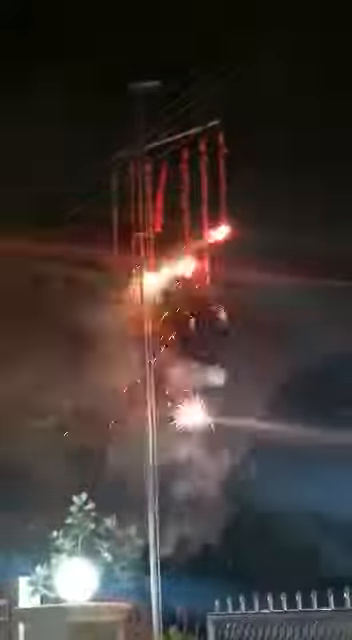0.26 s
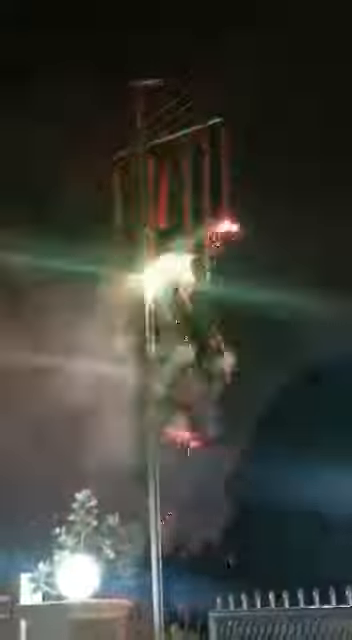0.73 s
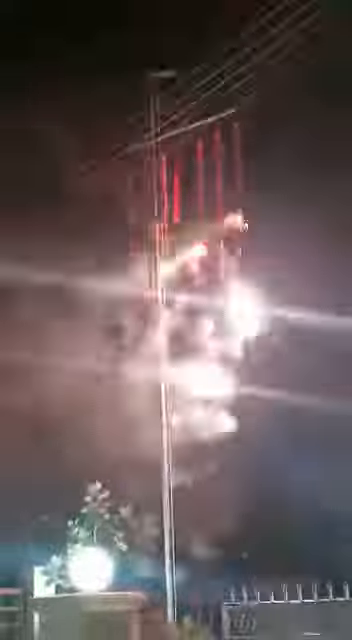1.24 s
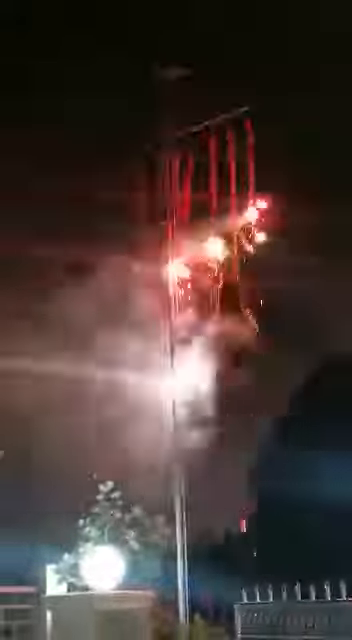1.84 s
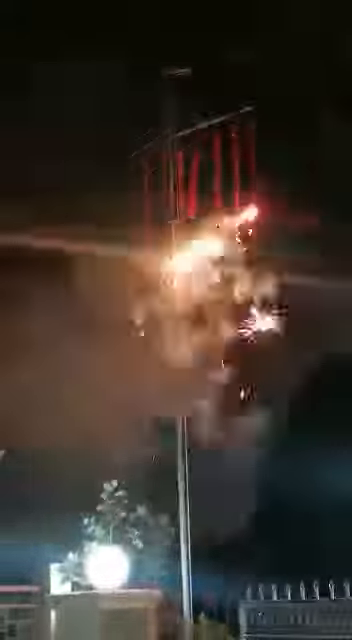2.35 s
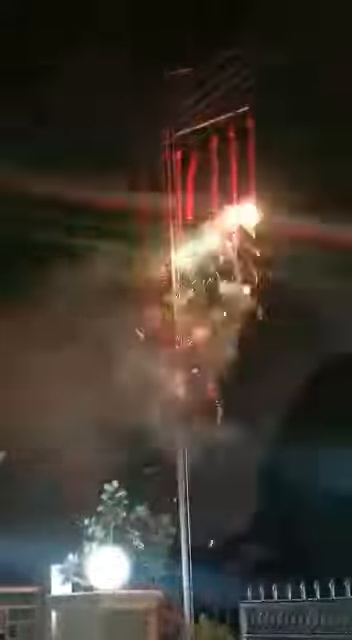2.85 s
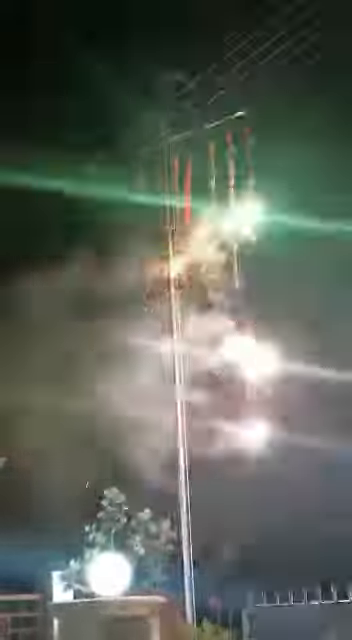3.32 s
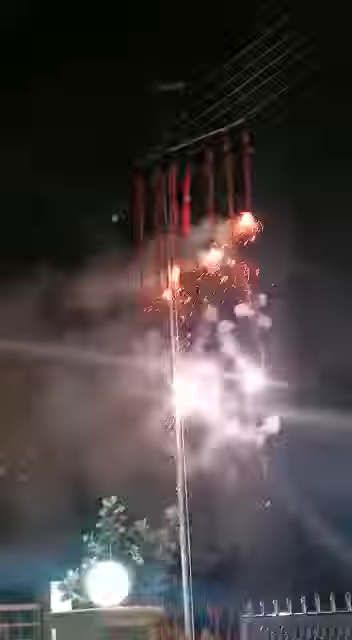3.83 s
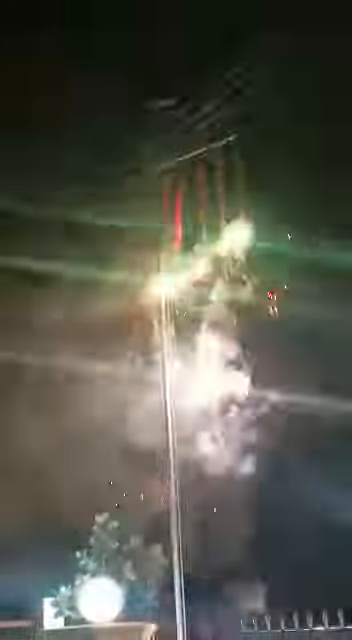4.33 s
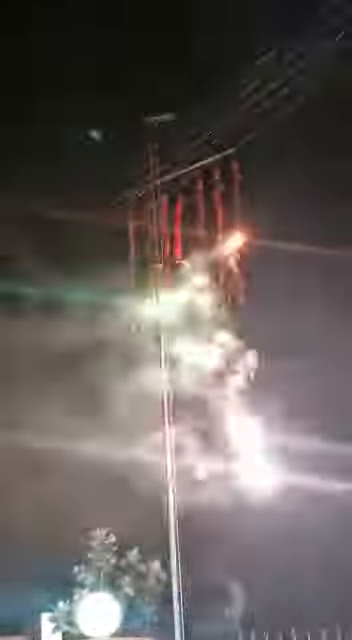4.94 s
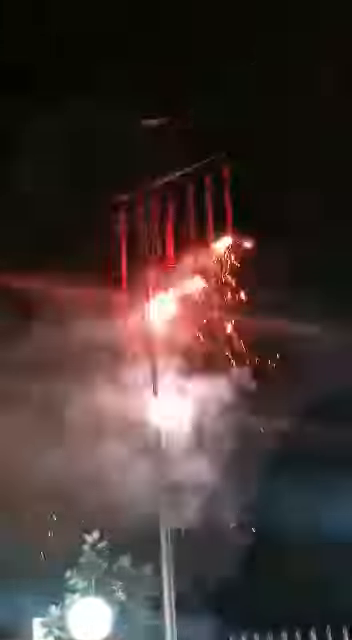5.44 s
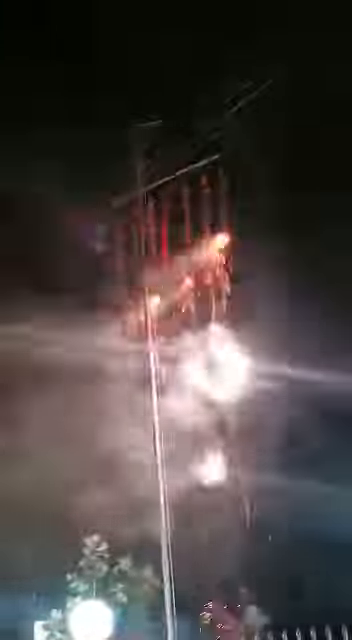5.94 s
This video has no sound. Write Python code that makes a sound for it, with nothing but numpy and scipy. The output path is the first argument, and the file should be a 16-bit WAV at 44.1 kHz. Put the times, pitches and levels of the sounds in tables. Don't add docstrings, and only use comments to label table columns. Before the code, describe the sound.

Dense firecracker crackle a few metres from a phone, outdoors between walls. Dozens of hard cracks per second or so overlap with quick slapback reflections and a half-second hissing reverberant tail. Nearest bangs clip and thud, jumping between the stereo sides. Levels are squashed, treble is dulled and slightly gritty. One soft far boom is heard near the start, one abrupt silence after four seconds, then the barrage continues to the end.

```python
import sys
import numpy as np
from scipy import signal
from scipy.fft import rfft, irfft
from scipy.io import wavfile

SR = 44100
rng = np.random.default_rng(int(sys.argv[2]) if len(sys.argv) > 2 else 0)


def amplitude_ratio(level_db):
    exponent = np.asarray(level_db, float) / 20
    return 10 ** exponent


def transcribe(u):
    v = np.clip(np.atleast_2d(u).T, -1, 1)
    q = np.round(v * 32767).astype(np.int16)
    wavfile.write(sys.argv[1], SR, q)


N = 272538


def band(x, lo_hz, hi_hz):
    return signal.sosfilt(signal.butter(2, [lo_hz, hi_hz], "bandpass", fs=SR, output="sos"), x)


def train(start_s, size):
    samples = np.clip((start_s * SR).astype(int), 0, N - 1)
    return np.bincount(samples, size, N)


# first_s, last_s, first_bang_db, other_bangs_db
VOLLEY_TIMES = [(0, .2261, -14.5, -21), (.318, .3293, -26, -20.5), (0.4025, .4029, -16, -20),
                (.604, .6598, -16, -21), (0.7117, .7746, -22, -20.5), (.8302, .8622, -18, -19.5),
                (.9133, .9484, -18.5, -21), (1.0052, 1.0308, -19, -17), (1.122, 1.2451, -15.5, -20.5),
                (1.3517, 1.4112, -16, -19), (1.614, 1.627, -17, -30), (1.698, 1.7263, -17.5, -20.5),
                (1.8019, 1.8415, -19.5, -17), (1.9133, 1.9424, -20, -19), (2.0211, 2.301, -18, -19.5),
                (2.3506, 2.7529, -18.5, -21), (2.8194, 2.9064, -18, -18.5), (2.979, 3.1198, -15.5, -20),
                (3.177, 3.2488, -17, -20.5), (3.312, 3.3559, -13.5, -17), (3.4422, 3.488, -17, -22),
                (3.537, 3.7205, -28.5, -19), (3.784, 3.8767, -20, -21), (3.939, 4.0222, -17, -19.5),
                (4.425, 4.5298, -10.5, -20), (4.7074, 4.877, -15.5, -25.5), (4.9293, 5.3592, -21, -22),
                (5.4407, 5.4726, -28, -19.5), (5.613, 5.7882, -23.5, -22), (5.9209, 6.1036, -20.5, -22)]
# start_s, bang_db, left_overload_db, right_overload_db
LEFT_FACING = [(.0339, -16, -19, -21), (.131, -17, -18, -21), (.8302, -16.5, -21, -22),
               (.9133, -19, -19, -25), (1.219, -17, -19, -19), (1.3923, -20, -18, -17.5),
               (1.468, -19.5, -21, -22), (1.7263, -16.5, -18, -21), (2.0213, -18, -21, -25),
               (2.4435, -22, -19, -35), (2.583, -22, -21, -25), (2.979, -13.5, -18, -18),
               (3.3559, -27.5, -17, -24), (3.4611, -21.5, -18, -19), (3.784, -15.5, -15, -17),
               (3.791, -16.5, -18, -40.5), (3.9391, -16, -20, -25.5), (4.4661, -25, -19.5, -12),
               (4.5298, -19, -14.5, -24), (4.7076, -14.5, -21, -16), (4.8011, -20.5, -14, -18),
               (4.9294, -21.5, -15, -17), (5.011, -19, -22, -43), (5.064, -15, -22, -13.5),
               (5.1656, -20.5, -18, -31), (5.3592, -41, -22, -40), (5.4406, -18, -19.5, -19),
               (5.6486, -22, -17.5, -20), (5.9622, -16.5, -21, -30), (6.1478, -16.5, -19, -19)]
# start_s, bang_db, left_overload_db, right_overload_db
RIGHT_FACING = [(.072, -16.5, -22, -17), (.7115, -22, -40, -19.5), (1.0152, -18, -38, -19),
                (1.1538, -17, -42, -14.5), (1.8017, -20, -40, -18), (1.807, -23.5, -24, -19),
                (2.2314, -21.5, -40, -16), (2.2735, -24, -26, -19), (2.4547, -24, -38, -18),
                (2.6834, -24, -38, -18), (2.8191, -18, -32, -16), (2.8624, -20.5, -25, -21),
                (2.8972, -14, -28, -16), (3.177, -17.5, -26, -20), (3.2336, -18, -37, -18),
                (3.488, -16, -42, -14), (3.5834, -27, -22, -17), (3.6092, -23, -30, -20),
                (3.985, -21.5, -20, -18), (4.0698, -13.5, -37.5, -20.5), (4.7573, -20.5, -25, -15.5),
                (4.8441, -15.5, -26, -20), (4.968, -23, -43, -19), (5.1036, -18, -40, -15),
                (5.148, -20.5, -38, -16), (5.2412, -26, -42, -17.5), (5.3283, -29, -33, -18.5),
                (5.75, -21.5, -28, -16), (5.856, -20, -24, -17.5), (6.1176, -21, -40, -17)]
# start_s, bang_db, left_overload_db, right_overload_db
FRONT_FACING = [(.101, -25, -24, -25), (.631, -19.5, -27, -27), (.7539, -18.5, -21, -26),
                (2.0781, -16, -40, -19), (2.183, -21, -26, -19), (2.3937, -16.5, -23, -20),
                (2.497, -22, -24, -22), (2.5478, -24, -25, -22), (2.709, -17, -25, -24),
                (2.9997, -22, -21, -26), (3.0392, -15, -32, -25), (3.191, -23, -25, -22),
                (4.5005, -18, -27, -20), (5.2798, -21.5, -39, -14.5), (5.538, -20, -27, -26),
                (5.634, -20.5, -26, -27), (5.7277, -22.5, -21, -20), (5.9763, -23, -30, -18),
                (6.0781, -22, -22, -20)]


def volleys():
    fuse_ms, slip, clear_ms = 22, 0.45, 10
    charge_db = 1.5
    most_db, shortfall_db = (-24, -22.5), (10.5, 8)
    lead_db, lead_spread = (-26, -21.5), 0.34
    listed = np.array(list(LEFT_FACING) + list(RIGHT_FACING) + list(FRONT_FACING))
    chances = rng.random((len(VOLLEY_TIMES), 4, 24))
    rows = []
    for (first, last, first_db, rest_db), chance in zip(VOLLEY_TIMES, chances):
        gaps = int(np.ceil((last - first) * 1000 / fuse_ms - 0.5))
        s = np.linspace(first, last, gaps + 1)
        s[1:-1] += slip * fuse_ms / 1000 * (2 * chance[0, 1:gaps] - 1)
        db = rest_db + charge_db * 2 * (2 * chance[1, :gaps + 1] - 1)
        db[0] = first_db
        overload = []
        for side in range(2):
            side_db = most_db[side] + shortfall_db[side] * np.log(chance[2 + side, :gaps + 1])
            side_db[0] = lead_db[side] + lead_spread * (side_db[0] - most_db[side])
            overload.append(side_db)
        for row in zip(s, db, *overload):
            if np.abs(listed[:, 0] - row[0]).min() * 1000 > clear_ms:
                rows.append(row)
    return np.concatenate([listed, rows])


# delay_ms, level_db, ring_hz, ring_ms
FIRST_ARRIVALS = [
    (0, 4.5, 4500, 0.2),
    (3.78, -2.5, 6800, 0.48),
    (7.63, -6.5, 4400, .35),
    (10.92, 4, 2340, 0.25),
    (23.96, -1, 2500, 0.3),
]


def cracks(start_s, size):
    scatter_db, jitter_ms = 3.5, 0.15
    t = np.arange(256) / SR
    out = 0
    for delay_ms, db, hz, ring_ms in FIRST_ARRIVALS:
        chance = rng.standard_normal((len(start_s), 2)).T
        at = start_s + (delay_ms + jitter_ms * np.sqrt(delay_ms / 4) * chance[0]) / 1000
        ring = np.sin(2 * np.pi * hz * t) * np.exp(-t * 1000 / ring_ms)
        shocks = train(at, size * amplitude_ratio(db + scatter_db * chance[1]))
        out = out + signal.fftconvolve(shocks, ring)[:N]
    return np.array([np.roll(out, 4), out])


def pinned(start_s, db, hold_ms=3.7, sag=0.51, rise_ms=0.16, spread=0.12):
    out = np.zeros(N + SR)
    starts = (start_s * SR).astype(int)
    for start, size, chance in zip(starts, amplitude_ratio(db), rng.standard_normal(len(starts))):
        t = np.arange(int(hold_ms * (1 + spread * chance) * SR / 1000)) * 1000 / SR
        out[start:start + len(t)] += size * (1 - np.exp(-t / rise_ms)) * (1 - sag * t / hold_ms)
    return out[:N]


# start_s, left_db, right_db
HARD_SLAMS = [(.6075, -10, -11), (.9275, -40, -12), (1.0082, -14, -13), (2.1857, -36, -11),
              (2.9096, -13, -23), (3.1804, -28, -14), (3.2363, -11, -6), (3.4914, -40, -10),
              (3.5868, -19, -6), (3.951, -11, -6), (4.5359, -17, -32), (4.855, -40, -10), (5.107, -40, -13),
              (5.1507, -40, -5), (5.6382, -18, -11), (5.7536, -37, -12), (6.1067, -40, -7)]


def push_backs(start_s, scatter_db=3.0):
    ground_ms, wall_ms, ground_odds, wall_odds = 3.4, 10.4, 0.13, 0.1
    luck, size = rng.random(len(start_s)), rng.standard_normal((len(start_s), 2))
    late = np.where(luck < ground_odds, ground_ms, wall_ms) / 1000
    levels = np.array((-30.5, -21.5)) + scatter_db * size
    rows = np.column_stack([start_s + late, levels])
    return np.concatenate([HARD_SLAMS, rows[luck < ground_odds + wall_odds]])


def rebound(start_s, db, late_ms=0.37, fall_ms=0.52):
    dips = train(start_s + late_ms / 1000, amplitude_ratio(db))
    return -signal.lfilter([1], [1, -np.exp(-1000 / fall_ms / SR)], dips)


# low_hz, high_hz, t60_s
YARD_BANDS = [
    (60.7, 622, 0.39),
    (445, 2366, 0.65),
    (1773, 5070, 0.6),
    (5433, 9900, 0.59),
    (10300, 36700, 0.41),
]
PORT_LIKENESS = [
    (.1, 0),
    (.5, 0),
    (.1, 5),
    (.1, 5),
    (0, 5),
]


def yard(build_ms=15, sparse_db=4.5):
    t = np.arange(int(0.7 * SR)) / SR
    echoes = rng.standard_normal((3, len(t))) * amplitude_ratio(sparse_db * rng.standard_normal(len(t)))
    echoes = echoes / echoes.std()
    out = 0
    for (lo_hz, hi_hz, t60), (like, lag) in zip(YARD_BANDS, PORT_LIKENESS):
        shared = np.array([np.roll(echoes[0], lag), echoes[0]])
        pair = np.sqrt(like) * shared + np.sqrt(1 - like) * echoes[1:]
        out = out + band(pair, lo_hz, min(hi_hz, 0.45 * SR)) * amplitude_ratio(-60 * t / t60)
    return out * np.sqrt(1 - 0.57 * np.exp(-t * 1000 / build_ms))


# freq_hz, level_db
BLAST_COLOUR = [(90, -27), (150, -11.5), (300, -3.5), (800, -7), (1700, -2), (3000, -8), (4300, -10.5),
                (5700, -2), (6400, -8.5), (7600, -3), (8800, -17.5), (10000, -12), (12000, -20.5),
                (16000, -29)]
# freq_hz, left_over_right_db
PORT_TILT = [(100, 3), (300, 4), (700, 2), (1300, 1.5), (2400, 2), (4400, 0), (7000, 4.5), (9000, 12),
             (11500, 3), (15000, 9.5)]


def colour(x):
    log_hz = np.log(np.fft.rfftfreq(2048, 1 / SR) + 1)

    def curve(table):
        hz, db = np.transpose(table)
        return np.interp(log_hz, np.log(hz), db)

    cepstrum = irfft(np.log(amplitude_ratio(curve(BLAST_COLOUR))))
    cepstrum[1:1024] *= 2
    cepstrum[1025:] = 0
    causal = irfft(np.exp(rfft(cepstrum)))
    tilt_db = curve(PORT_TILT)
    ports = np.fft.fftshift(irfft(amplitude_ratio(np.array([tilt_db, -tilt_db]) / 2)), axes=1)
    common = signal.fftconvolve(x, causal[None], axes=1)[:, :N]
    return signal.fftconvolve(common, ports, "same", axes=1)


def rumble(start_s, db, t60, lo_hz, hi_hz, like=0.3):
    power = signal.lfilter([1], [1, -amplitude_ratio(-120 / t60 / SR)], train(start_s, amplitude_ratio(2 * db)))
    mid, left, right = band(rng.standard_normal((3, N)), lo_hz, hi_hz)
    apart = np.array([left * amplitude_ratio(9), right])
    pair = np.sqrt(like) * mid + np.sqrt(1 - like) * apart
    return np.sqrt(power) * pair / pair.std()


# start_s, level_db
FAR_BOOMS = [
    (.468, -27),
]
# start_s, level_db
FAR_ARRIVALS = [
    (.467, -21),
    (.4735, -19),
    (.492, -21),
    (.531, -25),
]


def far_boom(hz=400, ring_ms=1.8):
    roll = rumble(*np.transpose(FAR_BOOMS), 0.66, 190, 500)
    s, db = np.transpose(FAR_ARRIVALS)
    t = np.arange(-120, 300) / SR
    knock = np.cos(2 * np.pi * hz * t) * np.exp(-(t * 1000 / ring_ms) ** 2)
    return roll + signal.fftconvolve(train(s, amplitude_ratio(db)), knock)[:N]


def scene():
    s, bang_db, left_db, right_db = volleys().T
    strings = 6
    string = np.argsort(np.argsort(s)) % strings
    tails = 0
    for k in range(strings):
        bangs = train(s, amplitude_ratio(bang_db) * (string == k))
        tails = tails + signal.fftconvolve(bangs[None], yard(), axes=1)[:, :N]
    crack = amplitude_ratio(18) * cracks(s, amplitude_ratio(np.maximum(left_db, right_db)))
    thump = amplitude_ratio(5) * np.array([pinned(s, left_db), pinned(s, right_db)])
    air = colour(crack + amplitude_ratio(13) * tails / (1 + (thump / 0.25) ** 2))
    dip_s, *dip_db = push_backs(s).T
    thump = thump + amplitude_ratio(4) * np.array([rebound(dip_s, db) for db in dip_db])
    low = rumble(s, bang_db - 17, 0.58, 22, 140) + far_boom()
    coupling = signal.butter(1, [28, 2500], "bandpass", fs=SR, output="sos")
    return air + low + signal.sosfilt(coupling, thump)


def starve(x, edge_hz=10100, edge_odds=0.47, top_odds=0.097, width_hz=420):
    top_hz = 15250
    hz, _, frames = signal.stft(x, SR, nperseg=2048, noverlap=1536)
    slot = (hz // width_hz).astype(int)
    odds = top_odds * (hz > edge_hz) + edge_odds * np.exp(-((hz - edge_hz) / 600) ** 2)
    odds = odds + 0.25 * (hz > top_hz - 450)
    loud = np.abs(frames).mean(axis=(0, 1))
    lull = np.clip(np.median(loud) / (loud + 1e-9), 0.6, 4)
    luck = rng.random((2, 100, len(loud) // 5 + 1))
    luck = np.repeat(luck, 5, axis=2)[:, slot, :len(loud)]
    kept = (luck > odds[:, None] * lull) * (hz < top_hz)[:, None]
    return signal.istft(frames * kept, SR, nperseg=2048, noverlap=1536)[1][:, :N]


def roll_off(x):
    return signal.sosfilt(signal.butter(12, 16340, fs=SR, output="sos"), x)


def record(dry):
    t = np.arange(N) / SR
    held = 0.5 * dry / (0.5 ** 4 + dry ** 4) ** 0.25
    body = signal.sosfiltfilt(signal.butter(8, 9000, fs=SR, output="sos"), held)
    held = starve(body + amplitude_ratio(-10) * (held - body))
    lost_s, back_s = 4.0838, 4.4465
    on = np.clip(np.maximum(lost_s - t, t - back_s) / 0.0002, 0, 1)
    kept = signal.sosfilt(signal.butter(1, 12, "highpass", fs=SR, output="sos"), held) * on
    return roll_off(kept)


dry = scene()
out = record(dry)
transcribe(out)
```